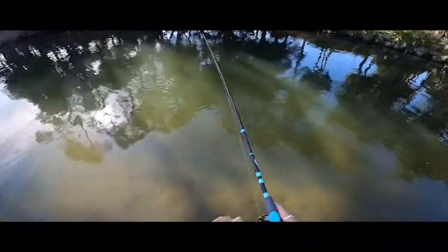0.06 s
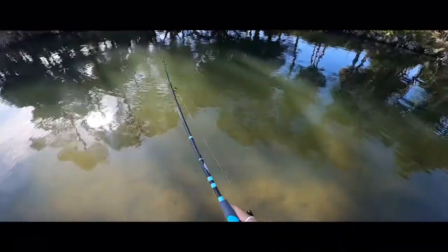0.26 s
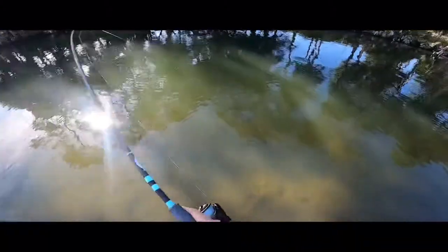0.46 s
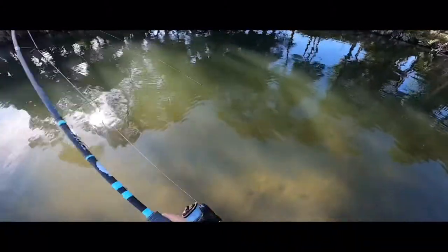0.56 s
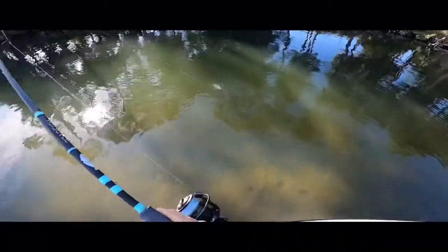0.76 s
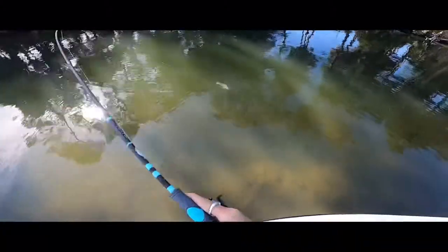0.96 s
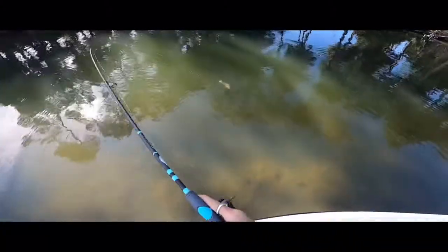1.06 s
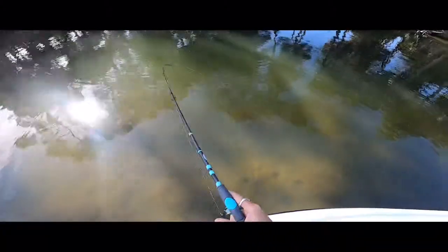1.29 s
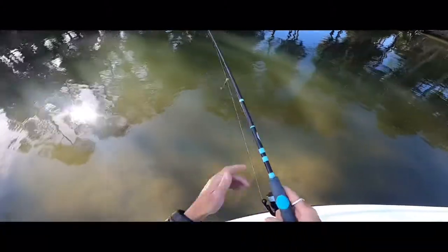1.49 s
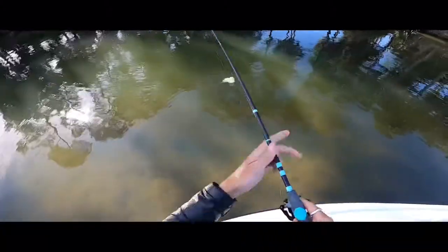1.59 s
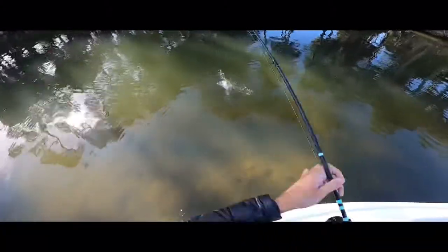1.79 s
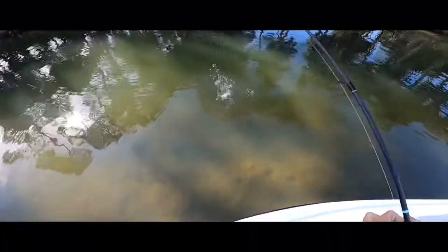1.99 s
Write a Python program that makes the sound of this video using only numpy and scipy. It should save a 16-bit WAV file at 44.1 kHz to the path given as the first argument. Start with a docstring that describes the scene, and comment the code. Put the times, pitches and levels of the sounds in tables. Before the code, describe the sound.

Fishing line zips out with a raspy, singing whine, followed by water splashes over low engine hum

```python
"""Fishing line runs close by in two spells, rasping and singing; a hooked fish is being played from a small boat.
The line is coloured noise through rod and reel resonances, plus a squeal whose pitch follows its speed.
Then the fish thrashes at the surface: noisy spray, damped bubble rings and sharp noise slaps,
with two ticks of the tackle and a brief echo off boat and water.
Behind lie a low, droning engine hum of summed sines, and noise for hull rumble, lapping water and open air."""
import sys
import numpy as np
from scipy import signal
from scipy.fft import rfft, irfft, next_fast_len
from scipy.io import wavfile
from scipy.ndimage import uniform_filter1d, map_coordinates

SR = 44100
rng = np.random.default_rng(int(sys.argv[2]) if len(sys.argv) > 2 else 0)


def file_out(sig):
    """Save sig as 16-bit WAV at sys.argv[1]."""
    # one column per channel
    cols = np.atleast_2d(sig).T
    # limit, then scale
    lim = np.clip(cols, -1, 1)
    pcm = np.round(lim * 32767).astype(np.int16)
    wavfile.write(sys.argv[1], SR, pcm)


N = 90096  # length in samples
T = np.arange(N) / SR  # time in s


def amp(db):
    """Decibels to gain."""
    return 10 ** (np.asarray(db) / 20)


def unit(x):
    """Scale to rms 1."""
    return x / np.sqrt(np.mean(x ** 2) + 1e-20)


def along(points, hz):
    """Interpolate (f/Hz, value) points on a log frequency axis."""
    f, v = np.transpose(points)
    return np.interp(np.log(hz + 1), np.log(f + 1), v)


def curves(rows):
    """One value per sample for each column after the time."""
    s, *cols = np.transpose(rows)
    return [np.interp(T, s, c) for c in cols]


def wobble(rate):
    """A smooth random curve with rate knots a second."""
    knots = rng.standard_normal(int(N * rate / SR) + 4)
    return map_coordinates(knots, [T * rate])


def filtered(x, response):
    """Multiply the spectrum of x by a response of frequency, padded so the tail does not wrap."""
    m = next_fast_len(N + SR // 2)
    spectrum = rfft(x, m) * response(np.fft.rfftfreq(m, 1 / SR))
    return irfft(spectrum, m)[..., :N]


def spread(pair, side_db, left_db):
    """Two signals as the middle and side of a stereo pair, leaning to the left by left_db."""
    mid, side = pair[0], amp(side_db) * pair[1]
    return np.array([mid + side, mid - side]) * amp([[left_db / 2], [-left_db / 2]])


def noise(colour):
    """Two unrelated coloured noises of joint rms 1."""
    white = rng.standard_normal((2, N))
    return unit(filtered(white, lambda hz: amp(along(colour, hz))))


def add(track, s, sound):
    """Mix a sound in at time s, cut at the end of the track."""
    part = track[..., max(0, round(s * SR)):][..., :sound.shape[-1]]
    part += sound[..., :part.shape[-1]]


# The line at the rod, close by, before flutter and the mix.
# Squeal of each spell, pitch following line speed: t/s, f/Hz, relative level/dB
FIRST_RUN = [(.03, 1300, -8), (.07, 1500, -8), (.079, 1720, 6), (.105, 2700, 5), (.122, 3250, -4),
             (.14, 2850, -3), (.168, 4150, 0), (.192, 2800, 4), (.228, 2200, 2), (.262, 2000, -16),
             (.297, 3150, -2), (.312, 2450, 2), (.36, 2350, -3)]
SECOND_RUN = [(.725, 1350, -12), (.755, 1480, 1), (.778, 1900, -4), (.804, 2650, 0), (.82, 2650, -4),
              (.838, 2000, -4), (.862, 1400, -4), (.888, 1900, -2), (.915, 2800, 2), (.935, 2850, 1),
              (.962, 4700, 3), (.977, 3550, -1), (.992, 4300, 2), (1.012, 2200, 2), (1.028, 2200, -14),
              (1.044, 2650, 2), (1.067, 4850, 0), (1.085, 3750, -2), (1.101, 4950, 4), (1.117, 4400, 2),
              (1.133, 2500, -5), (1.165, 3500, -2), (1.183, 3750, -7), (1.197, 5050, 3), (1.218, 4150, -4),
              (1.238, 5100, 0), (1.255, 2800, 7), (1.265, 2620, 4), (1.298, 3550, 0), (1.317, 2750, 0),
              (1.338, 3350, 2), (1.35, 2850, 1), (1.372, 2450, -6)]
# Pull on the line: t/s, relative level/dB
PULL = [(0, -49), (.05, -35.5), (.1, -35.5), (.17, -35.5), (.3, -36.5), (.36, -47), (.45, -71.5),
        (.67, -64), (.72, -34.5), (.78, -30), (.87, -31.5), (.96, -31.5), (1.025, -31), (1.07, -32),
        (1.14, -34.5), (1.24, -33), (1.35, -34), (1.385, -48), (1.43, -77)]


def line():
    """Pull drives both the friction rasp and the squeal of the running line."""
    hz, strength_db = curves(FIRST_RUN + SECOND_RUN)
    pull = amp(curves(PULL)[0])
    return pull * (rasp(hz, pull) + squeal(hz, strength_db))


# Colour of the rasp before the reel resonances: f/Hz, relative level/dB
RASP = [(400, -20.5), (1200, -4.5), (1800, -3), (2700, 1), (3800, -4), (5600, -2), (7000, -11.5),
        (9000, -18), (13000, -24), (15500, -35)]
RASP_DB, RASP_FLUTTER_DB = -3, 0.89
MID_SPEED_HZ, TREBLE_FROM_HZ = 3200, 4200
SPEED_POWER, PULL_POWER = 0.96, 0.96  # how treble gain grows with speed and pull


def rasp(hz, pull):
    """Friction noise through the rod rings, its treble growing with line speed and pull."""
    friction = unit(filtered(noise(RASP), reel))
    treble = filtered(friction, lambda f: f ** 4 / (f ** 4 + TREBLE_FROM_HZ ** 4))
    bright = (hz / MID_SPEED_HZ) ** SPEED_POWER * (pull / pull.max()) ** PULL_POWER
    body = spread(friction - treble, side_db=-15.5, left_db=0.5)
    edge = spread(treble, side_db=-1.0, left_db=-2.0) * 1.3 * bright
    return amp(RASP_DB + RASP_FLUTTER_DB * wobble(250)) * (body + edge)


# Resonances of the rod and reel: f/Hz, boost/dB of each alone
REEL = [(1800, 5), (2270, 7.5), (2800, 8.5), (3220, 8.5), (4000, 7.5), (5680, 0.5), (6850, 3)]
REEL_WIDTH_HZ = 70  # distance from the centre at which a boost in dB has halved


def reel(hz):
    """Gain of the rod and reel's resonances, their boosts summed in dB."""
    return amp(sum(db / (1 + ((hz - f) / REEL_WIDTH_HZ) ** 2) for f, db in REEL))


# How strongly the rod radiates the squeal: f/Hz, relative level/dB
ROD = [(1400, -11), (1900, -1), (2700, 0), (4800, 2), (5600, -1), (6300, -12), (10000, -30)]
# Octave of the squeal over the main partial, before the rod: t/s, level/dB
OCTAVE = [(.3, -10), (.76, 4), (.81, 1), (.84, 2), (.89, -2), (.93, -2), (.96, -13)]
SING_DB, SING_FLUTTER_DB, SING_WIDTH_HZ = -4.5, 4, 125


def squeal(hz, strength_db):
    """A jittery tone and its octave at a pitch set by line speed, radiated by the rod."""
    sing = np.zeros(N)
    phase = 2 * np.pi * np.cumsum(hz + SING_WIDTH_HZ * wobble(900)) / SR
    for k, db in [(1, 0), (2, curves(OCTAVE)[0])]:
        level = db + along(ROD, k * hz) + SING_FLUTTER_DB * wobble(240)
        sing += amp(level) * np.sin(k * phase)
    sing = amp(SING_DB + strength_db) * unit(sing)
    return spread([sing, np.roll(sing, 3)], side_db=-12.5, left_db=3.5)


# Water churned by the fish, near the boat: t/s, relative level/dB
SPLASH = [(1.1, -70), (1.3, -38.5), (1.37, -39), (1.41, -53), (1.635, -53), (1.65, -44), (1.7, -42),
          (1.735, -36), (1.78, -39.5), (1.87, -41), (1.92, -36), (1.985, -42), (2.02, -33)]
# Colour of the spray: f/Hz, relative level/dB
SPRAY = [(300, -21), (700, -0.5), (1300, -5.5), (2500, -4.5), (5500, -9.5), (7500, -17.5), (15500, -46)]
SPRAY_DB, DROPLETS_DB, DROPLETS_PER_S = -6, -4, 520


def splash():
    """Churned water: noisy spray and a shower of tiny ringing droplets of random pitch and size."""
    drops = np.zeros((2, N))
    for when, pitch, size, side in rng.random((int(DROPLETS_PER_S * N / SR), 4)):
        hz = 1100 * 4 ** pitch
        gain = amp(-4 * np.log(size + 0.018))
        mid_side = np.array([[1], [2 * side - 1]])
        add(drops, when * N / SR, gain * mid_side * bubble(hz, 24 / hz))
    spray = amp(SPRAY_DB + 0.48 * wobble(190)) * noise(SPRAY)
    churn = spray + amp(DROPLETS_DB) * unit(drops)
    return spread(churn, side_db=-13, left_db=-1.0) * amp(curves(SPLASH)[0])


def bubble(hz, t60, rise=0.2, onset_cycles=5.1):
    """A damped ring that rises in pitch as the bubble nears the surface."""
    t = np.arange(int(t60 * SR) + 1) / SR
    ring = np.sin(2 * np.pi * hz * t * (1 + rise * t / t60 / 2))
    return ring * amp(-60 * t / t60) * (1 - np.exp(-t * hz / onset_cycles))


# Single bubbles near the boat: t/s, starting f/Hz, relative level/dB, t60/s
BUBBLES = [(0.1606, 1030, -19.5, 0.015), (1.644, 1740, -24.5, 0.016), (1.719, 1672, -24.5, 0.015),
           (1.723, 1130, -22.5, .018), (1.736, 948, -22.5, 0.024), (1.7454, 3920, -13.5, 0.0064),
           (1.754, 2237, -21, .015), (1.803, 2460, -28.5, 0.011), (1.819, 1715, -23, 0.019),
           (1.87, 804, -24.5, 0.037), (1.899, 1344, -25.5, 0.023), (1.919, 1250, -25, 0.018),
           (1.965, 5440, -14.5, 0.0047), (1.964, 1870, -24.5, .022), (1.987, 6240, -29, 0.006),
           (2.0195, 2156, -14, .009), (2.033, 5690, -25.5, 0.0079)]
BUBBLE_CLICK_DB = -23  # gain of the click's noise before smoothing


def bubbles():
    """Larger single bubbles, each a damped ring with a faint smoothed noise click at its start."""
    near = np.zeros(N)
    for s, hz, db, t60 in BUBBLES:
        ring = bubble(hz, t60, onset_cycles=0.68)
        click = rng.standard_normal(len(ring)) * np.exp(-np.arange(len(ring)) / SR / 0.0015)
        click = uniform_filter1d(uniform_filter1d(click, size=4), size=3)
        add(near, s, amp(db + 1.5) * (ring + amp(BUBBLE_CLICK_DB) * click))
    return spread([near, np.roll(near, 5)], side_db=-27, left_db=-0.5)


# Fine spray falling back: t/s, relative level/dB
MIST = [(1.4, -71), (1.66, -51.5), (1.86, -53), (1.94, -40.5), (1.995, -47.5), (2.035, -47)]
# Its fizzing colour: f/Hz, relative level/dB
FIZZ = [(1000, -30), (3500, 0), (5800, 0), (7500, -7), (12000, -16), (15500, -29)]
MIST_DB = -0.5


def mist():
    """Fine spray falling back, a wide fizz of noise whose level flickers fast."""
    level = MIST_DB + curves(MIST)[0] + 2.9 * wobble(500)
    return spread(noise(FIZZ), side_db=1.5, left_db=-2.0) * amp(level)


def bursts(rows, colour, attack_s):
    """Short noisy blows that rise exponentially and die away fast."""
    envelope = np.zeros(N)
    for s, db, t60 in rows:
        age = np.maximum(T - s, 0)
        envelope += amp(db - 60 * age / t60) * (1 - np.exp(-age / attack_s))
    return envelope * noise(colour)


# Slaps on the water: t/s, relative level/dB, t60/s
SLAPS = [(1.512, -33, .03), (1.644, -29, .02), (1.821, -30, .018), (2.0145, -15, .031)]
# Colour of a slap: f/Hz, relative level/dB
SLAP = [(400, -16), (1100, -1), (2300, 4), (3200, -2), (4500, 2), (6000, -1), (8000, -16), (15000, -29)]


def slaps():
    """The fish slaps the surface: sharp bursts of coloured noise."""
    return spread(bursts(SLAPS, SLAP, attack_s=0.0014), side_db=-5.0, left_db=0.0)


# Ticks of the tackle: t/s, relative level/dB, t60/s
TICKS = [(1.397, -37.5, 0.016), (1.946, -31, 0.023)]
# Colour of a tick: f/Hz, relative level/dB
TICK = [(1000, -25.5), (4000, 2.5), (6300, 10), (8500, 0.5), (15000, -18)]


def ticks():
    """The tackle ticks: brighter, quicker noise bursts, wide and to the right."""
    return spread(bursts(TICKS, TICK, attack_s=0.00055), side_db=6, left_db=-4.5)


# Echo off the boat and water: f/Hz, t60/s
BANK = [(200, 0.044), (2000, 0.074), (10000, 0.016)]


def echo(x):
    """A brief diffuse answer from boat and water: noise decaying at its own rate in each band."""
    hz, t, z = signal.stft(rng.standard_normal((2, SR // 4)), SR, nperseg=256)
    decay = amp(-60 * t / along(BANK, hz)[:, None])
    tail = signal.istft(z * decay, SR, nperseg=256)[1]
    return signal.fftconvolve(x, tail / np.linalg.norm(tail[0]), axes=1)[:, :N]


# Engine hum under the scene: t/s, f/Hz, relative level/dB
ENGINE = [(0.0, 80.5, -17), (0.06, 81.2, -27), (0.08, 84.8, -18.5), (0.23, 83.8, -22.5), (0.26, 83, -17.5),
          (0.31, 84.8, -22), (0.45, 82.9, -19), (0.48, 84.76, -22.5), (0.52, 84.62, -14.5),
          (0.86, 83.3, -14.5), (0.9, 84.8, -17.5), (1.39, 83.62, -17), (1.5, 84.9, -14),
          (1.77, 84.37, -15.5), (1.96, 84.08, -10.5), (2.04, 83, -13.5)]
# Engine overtones: multiple of f, level/dB relative to the mean hum, before wobble
OVERTONES = [(2, -24.5), (3, -28), (4.2, -30)]


def engine():
    """A strong low order with faint overtones, unsteady in level and phase."""
    hz, db = curves(ENGINE)
    db = db + 3.0
    phase = 2 * np.pi * np.cumsum(hz) / SR
    hum = amp(db) * np.sin(phase)
    for k, level in OVERTONES:
        gain = amp(db.mean() + level + 4.0 * wobble(9.39))
        hum = hum + gain * np.sin(k * phase + 1.0 * wobble(12))
    return spread([hum, 0 * hum], side_db=0, left_db=1.5)


# Rumble of the hull: t/s, relative level/dB
RUMBLE = [(0, -29), (.3, -25), (.8, -26), (1.15, -25), (1.4, -28), (1.6, -28), (1.8, -26), (1.97, -32),
          (2.04, -28)]
# Its colour: f/Hz, relative level/dB
HULL = [(20, -40), (27, -28.5), (35, 2.5), (55, -2.5), (100, -3), (135, -1.5), (190, -1.5), (260, -13.5),
        (380, -15), (520, -23.5), (800, -39.5), (1600, -35.5), (4000, -94.5)]


def hull():
    """The hull rumbles: low coloured noise, nearly all in the middle."""
    return spread(noise(HULL), side_db=-22.0, left_db=3.0) * amp(curves(RUMBLE)[0] + 2.5)


# Water lapping and open air in the background: t/s, relative level/dB
LAPPING = [(0, -43), (.3, -41), (.6, -42), (.95, -43), (1.1, -37.5), (1.3, -39), (1.42, -42), (1.62, -39),
           (1.8, -38), (1.98, -45)]
# Their colour: f/Hz, relative level/dB
AIR = [(100, -5.5), (500, 5), (1100, -0.5), (2000, -7), (3000, -17), (6000, -22), (9000, -33),
       (15000, -67.5)]


def air():
    """Lapping water and open air as one coloured noise, slowly swelling."""
    level = curves(LAPPING)[0] + 0.89 * wobble(5.51)
    return amp(level) * spread(noise(AIR), side_db=-7.0, left_db=2.5)


def scene():
    """Line, fish and tackle with their echo, in front of the engine, hull and open air."""
    near = line() + splash() + bubbles() + mist() + slaps() + ticks()
    return near + amp(-7) * echo(near) + engine() + hull() + air()


TOP_HZ = 15600


def record(dry):
    """The microphone signal keeps nothing above the band limit."""
    return filtered(dry, lambda hz: hz < TOP_HZ)


dry = scene()
out = record(dry)
file_out(out)
```